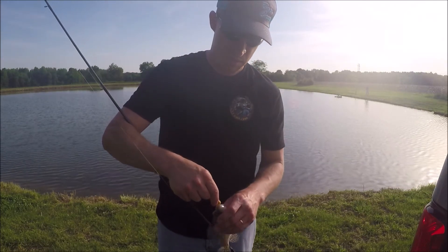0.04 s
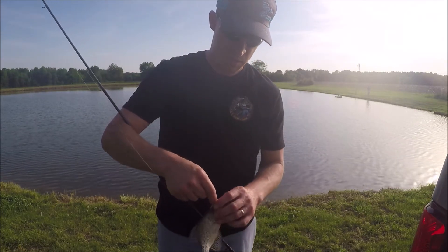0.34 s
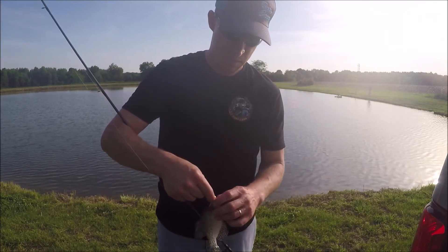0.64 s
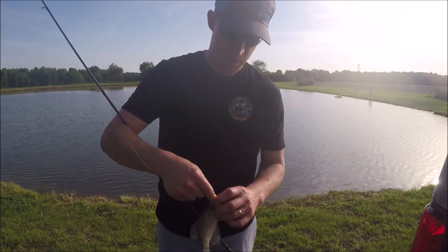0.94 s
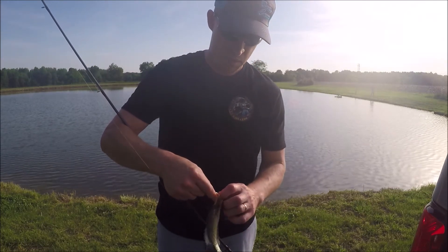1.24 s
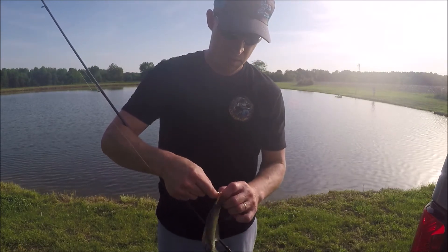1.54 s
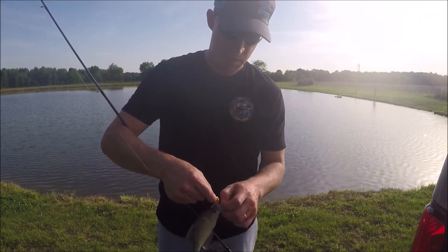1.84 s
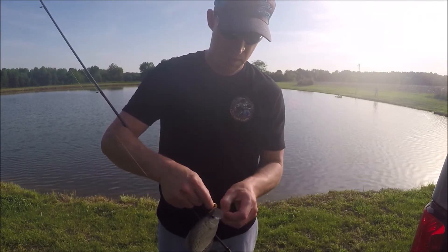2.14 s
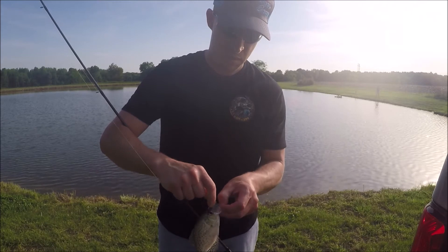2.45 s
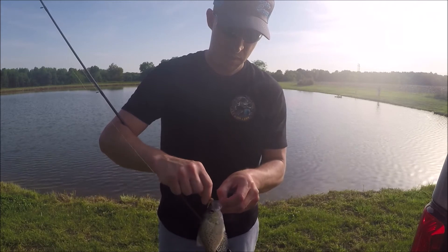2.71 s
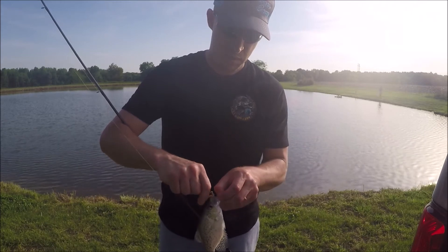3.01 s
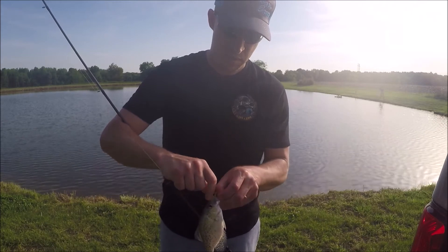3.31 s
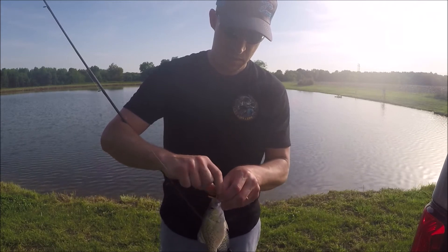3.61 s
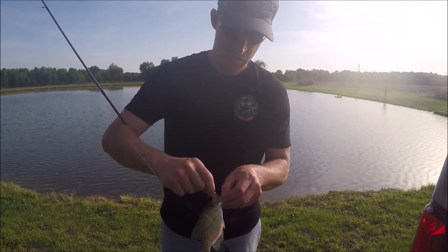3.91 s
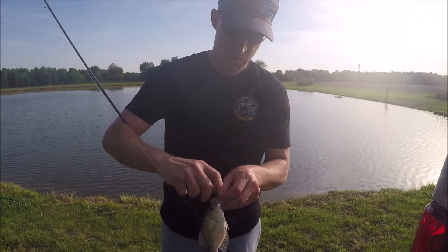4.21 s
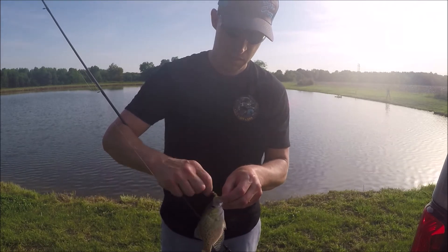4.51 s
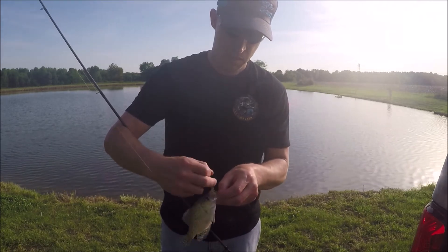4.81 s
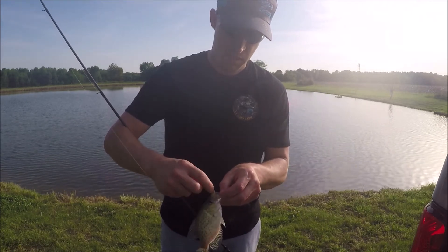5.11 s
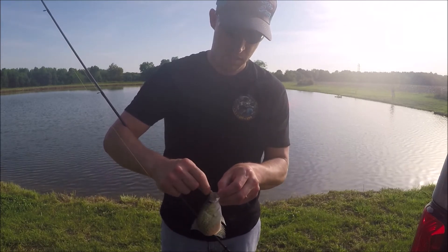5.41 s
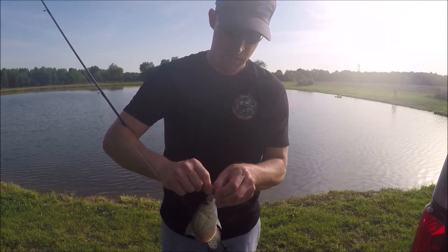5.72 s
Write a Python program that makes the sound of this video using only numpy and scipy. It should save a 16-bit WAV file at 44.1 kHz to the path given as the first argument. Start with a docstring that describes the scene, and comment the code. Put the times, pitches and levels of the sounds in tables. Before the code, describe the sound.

Distant birds call across open water, all very quiet. Brief hoarse notes come first, then three held whistles overlap a series of falling chirps that gradually spreads out and fades, with faint even pips behind it. A hook and line tick softly now and then near the microphone. Underneath lie a steady low engine hum, gentle air hiss and a faint high camera whine.

```python
"""Birds over a quiet pond

Far off, a bird sings a run of falling chirps that slows and flattens out, a second gives three held
whistles, and others call faintly: all gliding sines, echoed by the bank and the tree line. Under them
lie soft air hiss and a distant engine's low hum and rumble. Hands tick on fishing tackle in tiny
bursts of noise, and a small camera's electronics whine."""
import sys
import numpy as np
from scipy import signal
from scipy.fft import rfft, irfft
from scipy.io import wavfile
from scipy.ndimage import uniform_filter1d

SR = 44100
rng = np.random.default_rng(int(sys.argv[2]) if len(sys.argv) > 2 else 0)


def to_wav(sig):
    """Store sig (one row per channel, or 1-D mono) as 16-bit WAV at the path in sys.argv[1].

    Samples outside -1..1 are clipped; the rate is SR.
    """
    pcm = np.clip(np.atleast_2d(sig), -1, 1) * 32767
    pcm = np.round(pcm).astype(np.int16)
    wavfile.write(sys.argv[1], SR, pcm.T)  # frames by channels


N = 262395
T = np.arange(N) / SR
FREQS = np.fft.rfftfreq(N, 1 / SR)

# colour of the air hiss: f/Hz, density/dB
AIR_COLOUR = [(100, -106), (400, -102.5), (520, -103.5), (720, -106.5), (1300, -107), (2200, -106.5),
              (3400, -104.5), (3900, -107.5), (4900, -105.5), (5700, -107), (6500, -111), (9500, -112),
              (12000, -113), (14500, -113.5), (15200, -108)]
# stereo width of the air: f/Hz, side over mid/dB
AIR_SIDE = [(100, -37.5), (400, -12.5), (1200, -9.5), (2600, -19), (5000, -11), (9000, -3.5), (14000, -6.5)]
# partials of the engine's hum: f/Hz, level/dB
ENGINE_PARTIALS = [(19, -66), (28.8, -53), (33.2, -66), (48.5, -67.5), (66.3, -70), (85.3, -67.5),
                   (137, -76.5), (146, -81), (220, -82.5)]
# contour of its deepest throb, used around its mean: t/s, level/dB
ENGINE_THROB = [(0.0, -51.5), (1.52, -49), (2.22, -63), (2.29, -42.5), (2.33, -56.5), (3.25, -50),
                (3.83, -61), (3.91, -47.5), (4.49, -50.5), (4.84, -57), (4.96, -48.5), (5.47, -56.5),
                (5.9, -49.5), (5.95, -67.5)]
# colour of its rumble: f/Hz, density/dB
ENGINE_RUMBLE = [(5, -85.5), (10, -70.5), (40, -73), (65, -74.5), (100, -78.5), (150, -84), (200, -91.5),
                 (280, -101), (450, -113), (900, -135)]
# thin tones above the camera's main whine: f/Hz, level/dB
UPPER_WHINES = [(11808, -91), (14086, -87), (14985, -93)]
# narrow bands of electronic hiss: f/Hz, width/Hz, level/dB
CAMERA_HISS = [(5050, 44, -85), (10050, 510, -80.5)]
# hook, line and fingers: centre t/s, length/s, f/Hz, width/Hz, level/dB
TACKLE_TICKS = [(.807, .0073, 3700, 1100, -66.5), (0.969, 0.013, 600, 700, -68),
                (1.695, .003, 6700, 2600, -65), (1.797, .004, 11900, 2200, -64),
                (3.913, 0.017, 3350, 497, -61), (3.926, .005, 4000, 3200, -58.5),
                (4.972, .004, 3200, 2500, -62.5), (5.908, 0.0054, 3520, 4000, -62.5),
                (5.909, 0.019, 955, 400, -66), (5.946, 0.012, 3640, 1500, -58.5)]
# hoarse calls across the water: t/s, length/s, first f/Hz, middle f/Hz, last f/Hz, level/dB
HOARSE_CALLS = [(.075, .11, 1558, 1730, 1774, -68.5), (.165, 0.064, 1720, 1686, 1240, -68.5),
                (.210, .046, 2210, 2140, 1960, -71), (.295, .069, 1820, 1790, 1780, -73),
                (.300, .055, 1685, 1495, 1470, -69.5)]
# one falling note repeated at an even pace: t/s, level/dB
FAR_PIPS = [(3.095, -77), (3.416, -76.5), (3.735, -72.5), (4.064, -75), (4.380, -78)]
# thin peeps on one pitch: t/s, length/s, f/Hz, level/dB
FAR_PEEPS = [(0.24, 0.057, 3420, -69), (5.838, .14, 3336, -68.5)]
# held whistles: t/s, hold/s, fall/s, first f/Hz, held f/Hz, last f/Hz, held level/dB, fall level/dB
WHISTLE_NOTES = [(1.260, .092, .085, 3410, 3300, 2400, -54, -64),
                 (1.525, .098, .085, 3270, 3240, 2380, -69, -65.5),
                 (1.782, .108, .078, 3205, 3195, 2400, -62, -65)]
# the slowing song: t/s, length/s, top f/Hz, level/dB
SONG_CHIRPS = [(1.373, 0.055, 4550, -58.5), (1.491, 0.046, 3800, -59), (1.6, 0.044, 3650, -60),
               (1.717, 0.036, 3600, -59), (1.828, .046, 3550, -61), (1.952, 0.04, 3600, -58.5),
               (2.078, 0.052, 3550, -61), (2.214, .052, 3600, -59), (2.373, 0.061, 3400, -60),
               (2.555, .058, 3320, -62), (2.749, 0.06, 3400, -61), (2.965, 0.06, 3260, -61),
               (3.171, 0.05, 2980, -58), (3.374, 0.0473, 2960, -56), (3.581, 0.061, 3020, -58.5),
               (3.814, 0.098, 2920, -60), (4.107, 0.087, 2780, -62), (4.424, 0.1, 2780, -67),
               (4.863, 0.11, 2650, -70)]


def undb(db):
    """Decibels to gain."""
    return 10 ** (np.asarray(db) / 20)


def colour(points):
    """An EQ curve through (f/Hz, level/dB) points, as gain."""
    hz, db = np.transpose(points)
    return undb(np.interp(np.log(FREQS + 1), np.log(hz), db))


def noise(gain):
    """Noise with the given amplitude per root Hz."""
    return irfft(rfft(rng.standard_normal(N)) * gain, N) * np.sqrt(SR / 2)


def band(hz, width_hz):
    """A bell-shaped band of noise, rms 1; centred on zero it is a random wobble."""
    x = noise(np.exp(-((FREQS - hz) / width_hz) ** 2 * 2))
    return x / x.std()


def follow(curve):
    """A fader ride through (t/s, level/dB) points, as gain around its mean."""
    s, db = np.transpose(curve)
    return undb(np.interp(T, s, db - db.mean()))


def tone(hz):
    """A sine that follows a pitch track."""
    return np.sin(2 * np.pi * (np.cumsum(hz) / SR + rng.random()))


def arch(length, first, middle, last):
    """A pitch track that bends evenly through three pitches."""
    parabola = np.polyfit([0, .5, 1], [first, middle, last], 2)
    return np.polyval(parabola, np.linspace(0, 1, int(length * SR)))


def add(out, start, x):
    """Mix a short sound in at its time."""
    i = int(start * SR)
    out[i:i + len(x)] += x[:max(N - i, 0)]


def air(stir_db=1.64, crossover_hz=900):
    """A bed of even hiss, wider in the treble; its low end stirs with the breeze."""
    gain = colour(AIR_COLOUR)
    low_share = 1 / (1 + (FREQS / crossover_hz) ** 2)
    highs = noise(gain * np.sqrt(1 - low_share))
    lows = noise(gain * np.sqrt(low_share)) * undb(stir_db * band(0, 1.3))
    mid = highs + lows
    side = noise(gain * colour(AIR_SIDE))
    return np.array([mid + side, mid - side])


def engine(drift=.01185, throb_db=-1, swell_db=.5, throb_below_hz=42):
    """Wandering low partials in slowly swelling rumble; such long waves reach left and right alike."""
    throb = undb(throb_db) * follow(ENGINE_THROB)
    swell = undb(swell_db * band(0, 2.6))
    hum = np.zeros(N)
    for hz, db in ENGINE_PARTIALS:
        partial = np.sqrt(2) * undb(db) * tone(hz * (1 + drift * band(0, 1.954)))
        hum += partial * (throb if hz < throb_below_hz else swell)
    return hum + swell * noise(colour(ENGINE_RUMBLE))


def camera(whine_hz=8631.4, whine_db=-73, frame_hz=59.94, gap=.1, pull_rad=.64, lean_right_db=3):
    """The supply whines and hisses; once a frame its load dips, giving the whine a row of side tones."""
    frame = T * frame_hz % 1
    in_gap = np.abs(frame - .5) > (1 - gap) / 2
    load = uniform_filter1d(np.where(in_gap, .2, 1.), size=50)
    # the phase runs ahead under load and falls back in the gap
    lead = pull_rad * uniform_filter1d(frame, size=50)
    tones = [(whine_hz, whine_db)] + UPPER_WHINES
    whine = sum(undb(db) * np.sin(2 * np.pi * hz * T + lead) for hz, db in tones)
    hiss = sum(undb(db) * band(hz, width) for hz, width, db in CAMERA_HISS)
    pan = undb([[-lean_right_db / 2], [lean_right_db / 2]])
    return np.sqrt(2) * load * whine * pan + hiss


def tackle():
    """Tiny scrapes while a hook is worked loose, each a brief swell of band noise."""
    return sum(undb(db) * np.exp(-2 * ((T - centre) / length) ** 2) * band(hz, width)
               for centre, length, hz, width, db in TACKLE_TICKS)


def across_pond(x, scatter_db, t60, bank_s=.165, bank_db=-19, width=.051):
    """Direct sound, one faint slap off the bank, and a thin late scatter from the tree line."""
    t = np.arange(SR) / SR
    tail = rng.standard_normal((2, SR)) * undb(-60 * t / t60) * (1 - np.exp(-t / .014))
    tail /= np.sqrt(np.sum(tail ** 2, axis=1, keepdims=True))
    mid, side = (signal.fftconvolve(x, h)[:N] for h in tail)
    bank = undb(bank_db) * np.pad(x, (int(bank_s * SR), 0))[:N]
    return x + bank + undb(scatter_db) * np.array([mid + width * side, mid - width * side])


def sing(notes, waver, flutter_db, lateness=1, roundness=.6):
    """A bird's voice: each (t/s, pitch track, level/dB) note is a sine wavering under one swell."""
    out = np.zeros(N)
    pitch_wobble, level_wobble = band(0, 130), band(0, 130)
    for start, hz, db in notes:
        progress = np.linspace(0, 1, len(hz))
        here = (int(start * SR) + np.arange(len(hz))) % N
        swell = np.abs(np.sin(np.pi * progress ** lateness)) ** roundness
        gain = undb(db + flutter_db * level_wobble[here])
        add(out, start, swell * gain * tone(hz * (1 + waver * pitch_wobble[here])))
    return out


def far_birds(pip_s=.052, pip_hz=(1920, 1845, 1680)):
    """Hoarse calls roughened by fast pitch jitter, and the cleaner pips and peeps."""
    hoarse = [(start, arch(length, *pitches), db) for start, length, *pitches, db in HOARSE_CALLS]
    pips = [(start, arch(pip_s, *pip_hz), db) for start, db in FAR_PIPS]
    peeps = [(start, np.full(int(length * SR), float(hz)), db) for start, length, hz, db in FAR_PEEPS]
    return sing(hoarse, waver=.05, flutter_db=3) + sing(pips + peeps, waver=.01, flutter_db=2.5)


def whistles(attack_db=-11, fade_db=-7):
    """A held note swells, then the syrinx slackens: the pitch slides down as the note fades."""
    out = np.zeros(N)
    for start, hold, fall, first, held, last, held_db, fall_db in WHISTLE_NOTES:
        t = np.arange(int((hold + fall) * SR)) / SR
        slack = np.clip((t - hold) / (.72 * fall), 0, 1)
        slide_hz = (last - held) * np.sin(np.pi / 2 * slack) ** 2
        hz = np.interp(t, [0, hold], [first, held]) + slide_hz
        stages = [0, .55 * hold, .9 * hold, 1.1 * hold, hold + fall]
        db = np.interp(t, stages, [held_db + attack_db, held_db, held_db, fall_db, fall_db + fade_db])
        add(out, start, undb(db) * signal.windows.tukey(len(t), .1) * tone(hz))
    return out


def song(low_hz=2490, relaxed_hz=2680, relax_at_s=3.7, relax_span_s=.15, bend=.85, turn=.93):
    """Each chirp dives to a low note that lifts as the song relaxes; late ones are nearly flat."""
    notes = []
    for start, length, top_hz, db in SONG_CHIRPS:
        relaxed = (1 + np.tanh((start - relax_at_s) / relax_span_s)) / 2
        landing_hz = low_hz + (relaxed_hz - low_hz) * relaxed
        progress = np.linspace(0, 1, int(length * SR))
        dive = np.cos(np.pi / 2 * (progress / turn) ** bend) ** 2
        notes.append((start, landing_hz + (top_hz - landing_hz) * dive, db))
    return sing(notes, waver=.012, flutter_db=2.4, lateness=1.3, roundness=.75)


def scene():
    """The stereo mix: two lead birds and the wetter, farther callers over the quiet bed."""
    lead_birds = across_pond(song() + whistles(), scatter_db=-14, t60=1.4)
    callers = across_pond(far_birds(), scatter_db=-6, t60=.95)
    return lead_birds + callers + engine() + air() + tackle() + camera()


def record(dry):
    """A steep high cut takes off the very top."""
    high_cut = signal.ellip(12, .1, 70, 15270, fs=SR, output="sos")
    return signal.sosfilt(high_cut, dry)


dry = scene()
out = record(dry)
to_wav(out)
```